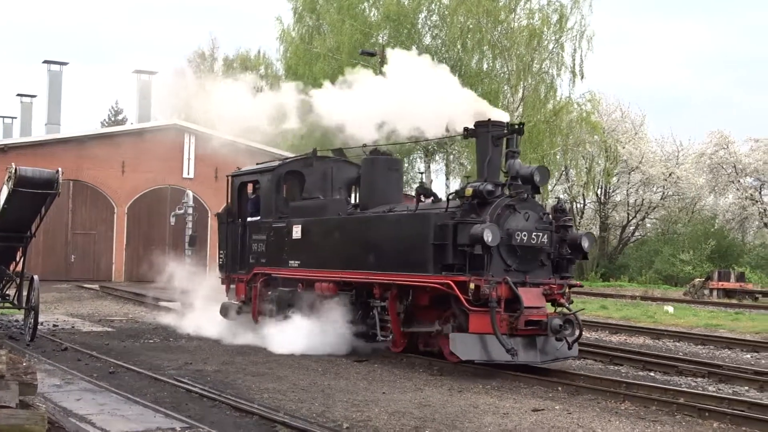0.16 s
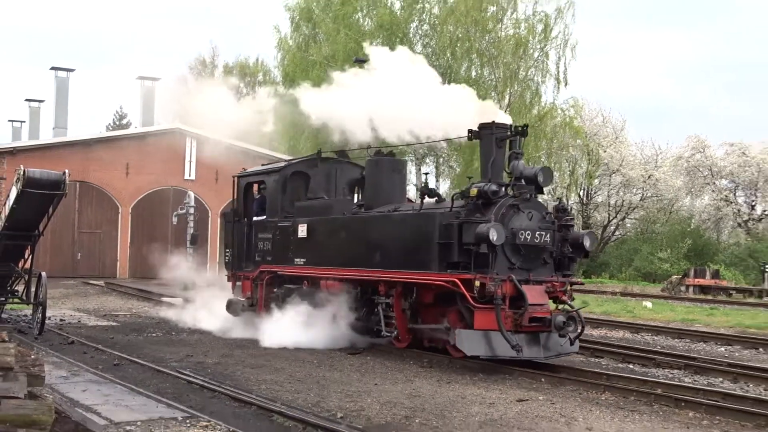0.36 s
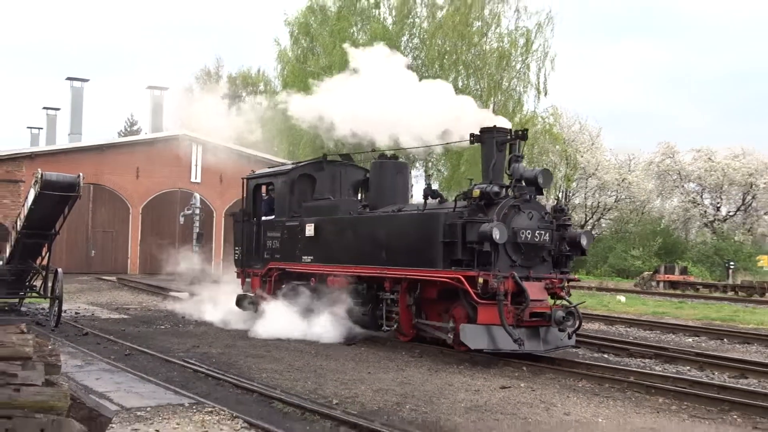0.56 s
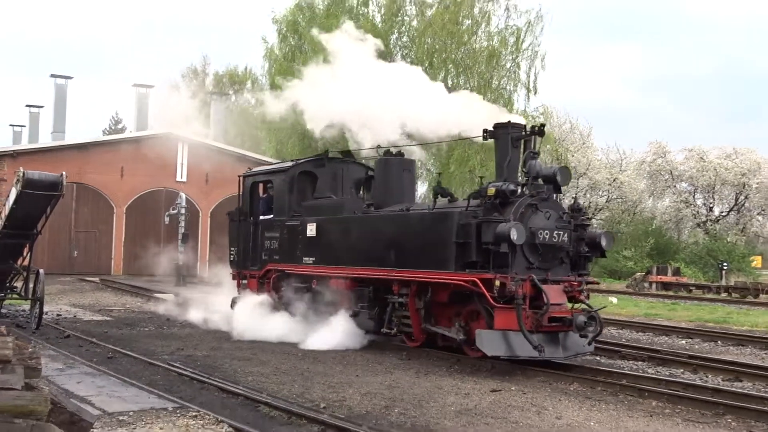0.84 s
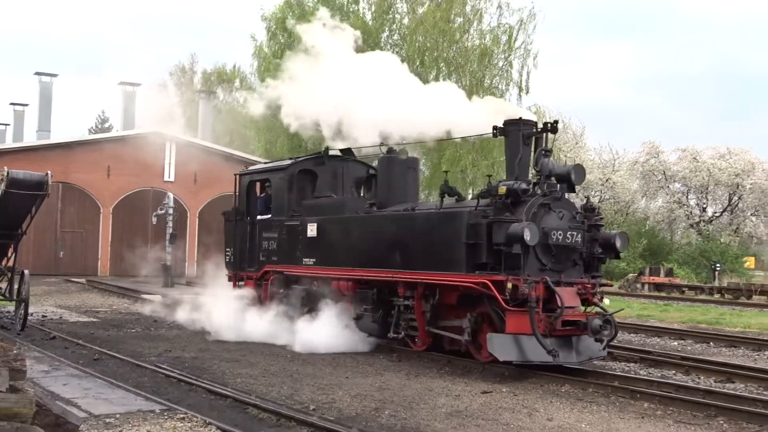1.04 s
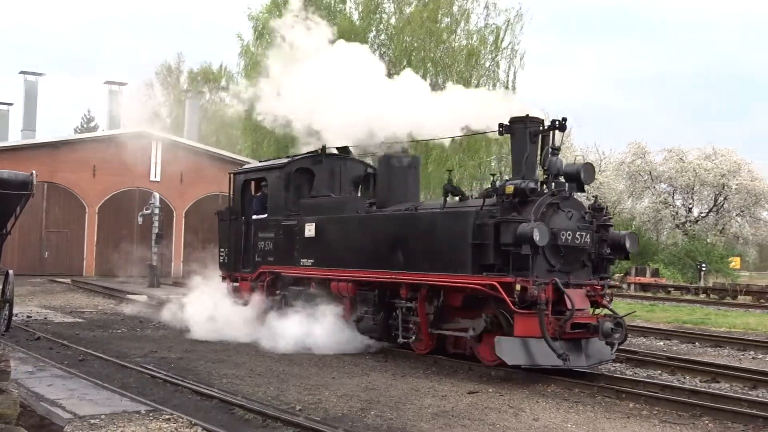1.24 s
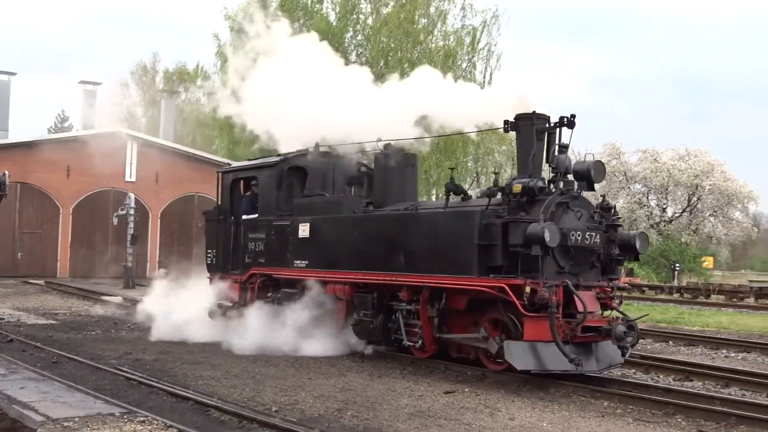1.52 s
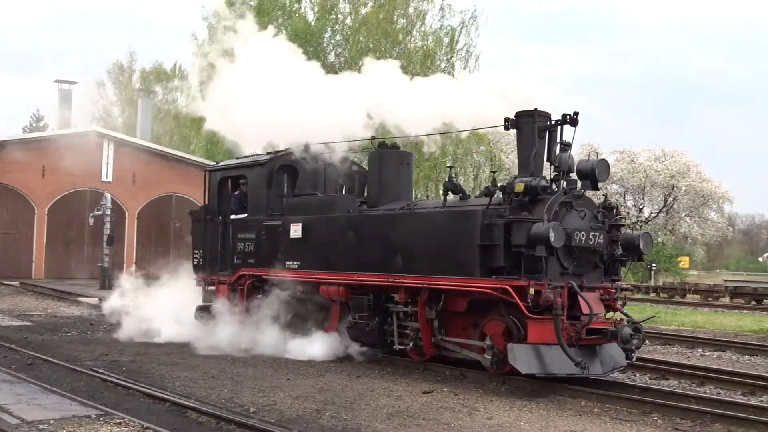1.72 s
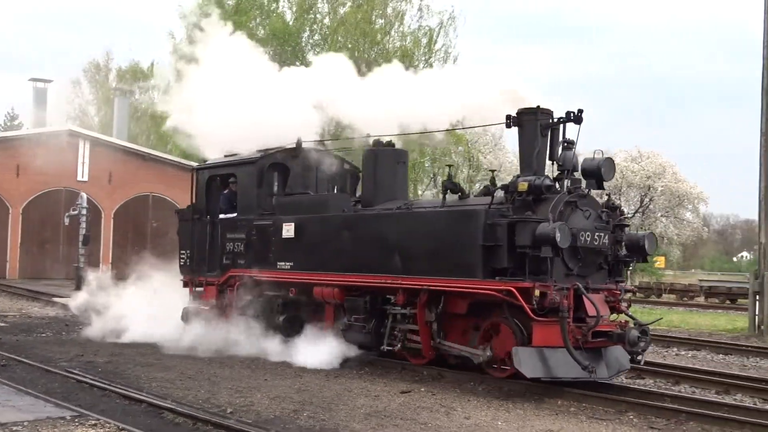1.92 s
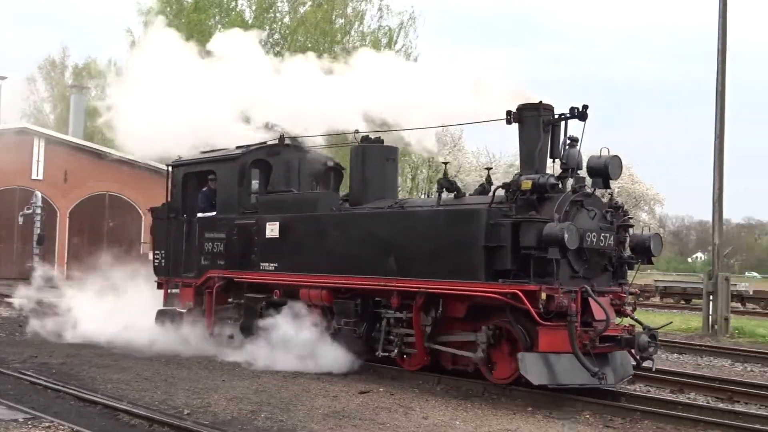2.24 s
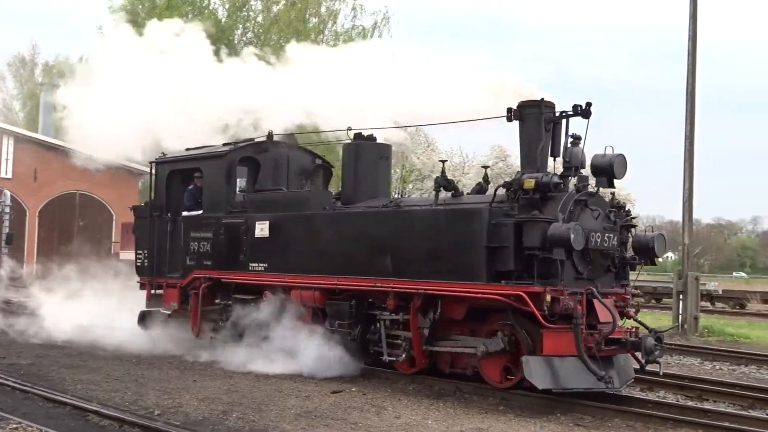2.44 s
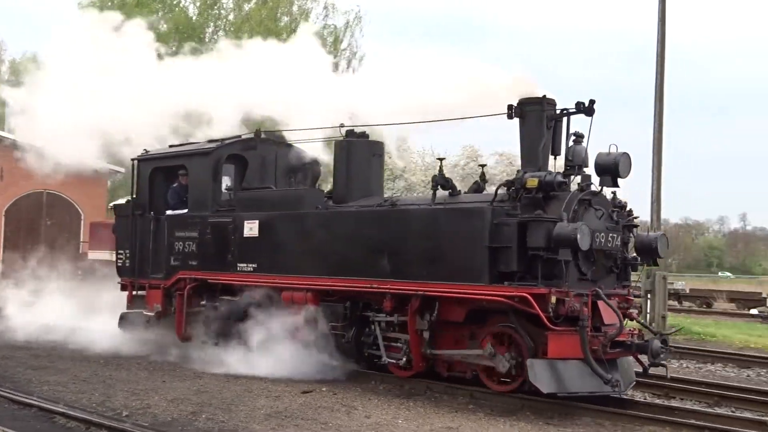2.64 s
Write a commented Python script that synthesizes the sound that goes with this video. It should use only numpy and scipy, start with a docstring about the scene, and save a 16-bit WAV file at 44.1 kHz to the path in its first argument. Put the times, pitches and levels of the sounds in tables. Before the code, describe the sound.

A steam locomotive rolls slowly closer, hissing bright wet steam throughout. A hard sputtering blast with a rough airy whistle comes early, another without it later, over soft chimney roar and faint rumble, outdoors in a yard.

```python
"""A steam locomotive rolls slowly closer across a yard, hissing wet steam from its open cylinder drain cocks.
The hiss is shaped noise; at two piston strokes a cock blows hard and its pipe rings as resonant noise.
A rough whistle, a narrow band of noise, rises with the first blow; water sputters and drops spit as clicks.
Low noise bands make the soft chimney roar, the rumbling running gear, the steam rush and short puffs.
Sliding echoes return from the engine's side and the shed."""
import sys
import numpy as np
from scipy import signal
from scipy.fft import rfft, irfft
from scipy.io import wavfile

SR = 44100
rng = np.random.default_rng(int(sys.argv[2]) if len(sys.argv) > 2 else 0)


def log_audio(samples):
    """Write samples as a 16-bit WAV file to the path given in sys.argv[1]."""
    # one column per channel
    frames = np.atleast_2d(samples).T
    # limit to full scale, then quantise
    limited = np.clip(frames, -1, 1)
    pcm = np.round(limited * 32767).astype(np.int16)
    wavfile.write(sys.argv[1], SR, pcm)


N = 122157
T = np.arange(N) / SR  # time of each sample [s]
HZ = np.maximum(np.fft.rfftfreq(N, 1 / SR), 1)  # frequency of each spectrum bin [Hz]

# Steam flow through the cocks, before trim: (time [s], level [dB])
FLOW = [(0, -28), (.13, -30.5), (.2, -32.5), (.34, -30.5), (.38, -26), (.43, -29.5), (.45, -24),
        (.65, -22.5), (.95, -23.5), (1.1, -27.5), (1.27, -24), (1.48, -28), (1.58, -22), (1.69, -20.5),
        (1.79, -22.5), (1.88, -21), (1.95, -22), (2.08, -21), (2.2, -22.5), (2.38, -23.5), (2.43, -20.5),
        (2.5, -21.5), (2.63, -23), (2.77, -19)]


def from_db(db):
    """Decibels to gain."""
    return 10 ** (np.asarray(db) / 20)


def rms_one(x):
    """Scale to unit rms."""
    return x / np.sqrt(np.mean(x ** 2) + 1e-20)


def in_time(rows):
    """Draw straight lines through (time, value) rows, one value per sample."""
    return np.interp(T, *np.transpose(rows))


def at_hz(points):
    """Read (frequency, value) rows at every bin, along a logarithmic frequency axis."""
    hz, value = np.transpose(points)
    return np.interp(np.log(HZ), np.log(hz), value)


def drift(rate):
    """Slow random wander of unit rms: noise through two equal one-pole lowpasses at rate [Hz]."""
    step = 40  # samples between control points
    pole = np.exp(-2 * np.pi * rate * step / SR)
    settling = 2000  # control points discarded while the filter settles
    steps = rng.standard_normal(N // step + settling + 2)
    slow = signal.lfilter([1], [1, -2 * pole, pole * pole], steps)[settling:]
    return np.interp(np.arange(N) / step, np.arange(len(slow)), rms_one(slow))


def flutter(depth_db, rate):
    """Gain of an unsteady flow, wandering by depth_db rms."""
    return from_db(depth_db * drift(rate))


def noise(gain):
    """Stereo turbulence of unit rms: random spectra in mid and side, shaped by a gain per frequency."""
    # stereo width: (frequency [Hz], side minus mid [dB])
    width_rows = [(60, -17), (170, -27.5), (400, -13), (1000, -12.5), (2800, -11.5), (5000, -13.5),
                  (7200, -18), (8700, -5), (11000, -13)]
    # stereo balance: (frequency [Hz], left minus right [dB])
    balance_rows = [(60, .1), (250, 0), (700, 1), (1200, 1.6), (2000, -0.9), (3600, 1.5), (7000, -0.2),
                    (8700, 4), (11000, -1)]
    real, imaginary = rng.standard_normal((2, 2, len(HZ)))
    mid, side = real + 1j * imaginary
    sign = np.array([[1], [-1]])  # left, right
    pair = mid + sign * from_db(at_hz(width_rows)) * side
    pair = pair * from_db(sign * at_hz(balance_rows) / 2)
    return rms_one(irfft(pair * gain, N))


def resonance(hz, width_hz):
    """Gain of a resonance, falling with the square of its detuning far from the centre."""
    return 1 / (1 + ((HZ ** 2 - hz ** 2) / (HZ * width_hz)) ** 2 / 2)


def ringing(modes, depth_db, rate):
    """Turbulence in a set of resonances, each wavering on its own."""
    return sum(from_db(db) * noise(resonance(hz, width_hz)) * flutter(depth_db, rate)
               for hz, width_hz, db in modes)


def waver(x, depth_db, rate, count):
    """Split the sound into overlapping strips, the lowest holding everything below the treble,
    each wandering in level; unit rms."""
    centres = np.linspace(4300, 10370, count)  # [Hz]
    spectrum = rfft(x)
    strips = 0
    for strip in np.eye(count):
        # triangular strips; the end strips stay open outward
        band = irfft(spectrum * np.interp(HZ, centres, strip), N)
        strips = strips + band * flutter(depth_db, rate)
    return rms_one(strips)


def yard(x):
    """Reflections cut hollows into the sound and comb it; their delays slide as the engine rolls."""
    # hollows in the colour: (frequency [Hz], width [Hz], level [dB])
    hollow_rows = [(1500, 60, -2.5), (3960, 48, -3.5), (6890, 114, -6), (8410, 160, -3), (9200, 90, -10)]
    # echoes from the engine's side and the shed: (delay [s], change of delay [s per s], level [dB])
    echo_rows = [(.0093, 0.004, -12), (.0217, 0.0035, -15.5), (.041, -0.0036, -13.5), (.067, -0.002, -13)]
    hollows_db = sum(db * np.exp(-((HZ - hz) / width_hz) ** 2 / 2) for hz, width_hz, db in hollow_rows)
    direct = irfft(rfft(x) * from_db(hollows_db), N)
    echoes = 0
    for delay, slide, db in echo_rows:
        heard_from = T - delay - slide * T
        echo = np.array([np.interp(heard_from, T, channel, left=0) for channel in direct])
        echoes = echoes + from_db(db) * echo
    return direct + echoes


def running_gear():
    """Wheels and rods rumble unevenly: low noise with a slow flutter."""
    # swells of the rumble: (time [s], level [dB])
    rumble_level = [(0, -51), (.3, -50), (.42, -46), (.55, -52), (.85, -56), (1.12, -45), (1.45, -51),
                    (1.62, -45), (1.69, -53), (2.04, -64), (2.09, -45), (2.27, -54), (2.33, -41),
                    (2.58, -49), (2.65, -38.5), (2.77, -55)]
    # colour of the rumble: (frequency [Hz], relative level [dB])
    rumble_colour = [(15, -14), (30, -17), (50, -7), (75, 2), (110, 1), (150, 0.5), (300, -32.5)]
    rumble = noise(from_db(at_hz(rumble_colour)))
    return rumble * from_db(in_time(rumble_level)) * flutter(depth_db=1.2, rate=3.3)


def chimney():
    """The soft hollow roar of exhaust steam: low noise with a fast flutter."""
    # swells of the roar, before trim: (time [s], level [dB])
    roar_level = [(0, -37.5), (.07, -35), (.17, -41), (.3, -37), (.45, -38), (.55, -39), (.8, -38.5),
                  (.9, -35), (1.25, -35), (1.62, -34), (1.72, -39.5), (2.05, -39.5), (2.09, -33),
                  (2.28, -35.5), (2.45, -33), (2.6, -33.5), (2.77, -31.5)]
    # colour of the roar, before the low cut: (frequency [Hz], relative level [dB])
    roar_colour = [(110, -13.5), (165, -2), (230, -0.5), (300, -1.5), (370, -1.5), (440, -9), (520, -18),
                   (640, -8), (780, -4), (950, -7.5), (1200, -9), (1500, -16.5), (2500, -30)]
    trim_db, low_cut_hz = 2, 108
    gain = from_db(at_hz(roar_colour)) / np.sqrt(1 + (low_cut_hz / HZ) ** 8)
    return noise(gain) * from_db(in_time(roar_level) + trim_db) * flutter(depth_db=1.47, rate=44)


def puffs():
    """Brief swells of escaping steam: resonant noise under bell-shaped envelopes."""
    # puffs: (centre time [s], length as bell-curve sigma [s], frequency [Hz], width [Hz], level [dB])
    puff_rows = [(0.127, 0.0077, 2470, 400, -34.5), (0.373, .03, 203, 69.7, -32.5),
                 (0.732, .025, 894, 451, -30.5), (.865, 0.0081, 645, 700, -30.5),
                 (1.548, 0.021, 261, 130, -31.5), (2.095, 0.029, 610, 600, -37.5),
                 (2.506, 0.015, 242, 111.3, -29.5)]
    total = 0
    for centre, length, hz, width_hz, db in puff_rows:
        swell = np.exp(-((T - centre) / length) ** 2 / 2)
        total = total + from_db(db) * swell * noise(resonance(hz, width_hz))
    return total


def rush():
    """Steam spreads along the ground: two noise bands swell separately and flutter together."""
    # swells of the low rush: (time [s], level [dB])
    low_level = [(0, -35), (.11, -38), (.2, -39.5), (.42, -37.5), (.47, -39), (.9, -29.5), (1.05, -36.5),
                 (1.2, -36), (1.35, -36.5), (1.5, -36), (1.62, -34.5), (1.72, -35.5), (2.08, -33),
                 (2.2, -36.5), (2.47, -32.5), (2.77, -36)]
    # colour of the low rush: (frequency [Hz], relative level [dB])
    low_colour = [(550, -18), (750, -6), (1150, -3), (1450, -4), (1750, 3), (2300, 2.5), (2650, -2.5),
                  (3000, -18), (4000, -36)]
    # swells of the upper rush: (time [s], level [dB])
    upper_level = [(0, -42), (.12, -39.5), (.2, -42), (.33, -48), (.385, -39), (.425, -44), (.455, -33),
                   (.6, -36.5), (.9, -32.5), (1.05, -37), (1.17, -41), (1.35, -34.5), (1.45, -39),
                   (1.56, -44), (1.66, -32), (1.87, -37), (2.09, -32.5), (2.31, -38), (2.45, -35),
                   (2.77, -33)]
    # colour of the upper rush: (frequency [Hz], relative level [dB])
    upper_colour = [(2000, -20), (2500, -1.5), (2850, 1.5), (3300, 2.5), (3950, -1.5), (4300, -0.5),
                    (5000, -5.5), (7000, -24)]
    low = noise(from_db(at_hz(low_colour))) * from_db(in_time(low_level))
    upper = noise(from_db(at_hz(upper_colour))) * from_db(in_time(upper_level))
    return (low + upper) * flutter(depth_db=1.0, rate=25)


def spits():
    """Drops of condensate burst at random: band-passed clicks, louder with the flow."""
    spits_per_s, level_db, spread_db = 130, -42.5, 1
    sizes_db = spread_db * np.minimum(rng.exponential(1, N), 3)
    bursts = rng.random(N) < spits_per_s / SR
    clicks = from_db(sizes_db) * rng.choice([-1, 1], N) * bursts
    band = signal.butter(1, (900, 6670), "band", fs=SR, output="sos")  # [Hz]
    crackle = rms_one(signal.sosfilt(band, clicks + 1e-18))
    flow_db = in_time(FLOW)
    # half a decibel for each decibel of flow
    return crackle * from_db(level_db + .5 * (flow_db - flow_db.mean()))


def sputter():
    """Water driven out with the steam sputters in each pipe's low resonances."""
    # envelope of each sputter: (time [s], level [dB])
    first_level = [(.42, -60), (.445, -27), (.495, -27.5), (.535, -36), (.565, -29.5), (.66, -32.5),
                   (.75, -30), (.785, -35), (.89, -34), (.97, -56), (1.1, -75)]
    second_level = [(1.62, -71), (1.648, -27), (1.678, -24), (1.71, -36), (1.77, -28.5), (1.86, -32.5),
                    (1.94, -31), (2.02, -38.5), (2.15, -49)]
    # low resonances of each pipe: (frequency [Hz], width [Hz], relative level [dB])
    first_throat = [(743, 100, -8.5), (1020, 190, -8), (1675, 200, -1.5), (2346, 300, -3.5)]
    second_throat = [(764, 96, -9), (1310, 175, -1.5), (1760, 67, -9), (2107, 44, -7), (2500, 37, -10.5)]
    first = from_db(in_time(first_level)) * ringing(first_throat, depth_db=2.04, rate=13)
    second = from_db(in_time(second_level)) * ringing(second_throat, depth_db=2.04, rate=13)
    return first + second


def whistle():
    """A narrow, fluttering band of turbulence that sags in pitch as it grows."""
    # swells of the whistle: (time [s], level [dB])
    whistle_level = [(0, -35.5), (.33, -36.5), (.38, -29), (.43, -31), (.455, -21.5), (.62, -23.5),
                     (.82, -23.5), (.95, -28), (1.1, -34.5), (1.4, -37), (2.2, -46), (2.77, -40)]
    centre_hz, width_hz, sag_hz_per_db = 7270, 280, 8.5
    db = in_time(whistle_level)
    sag_hz = sag_hz_per_db * (db - db.mean())
    bend = np.exp(-2j * np.pi * np.cumsum(sag_hz) / SR)
    # shifting the analytic signal moves the whole band in frequency
    band = signal.hilbert(noise(resonance(centre_hz, width_hz)))
    return from_db(db) * flutter(depth_db=1.0, rate=25) * np.real(band * bend)


def blows():
    """Each cock blows hard in turn, and turbulence rings in its drain pipe's resonances."""
    # one blow for each cock: (start [s], end [s], attack [s], release [s], level [dB])
    blow_rows = [(0.431, 0.847, 0.011, 0.15, -28), (1.633, 2.035, 0.039, 0.082, -28)]
    # resonances of the drain pipes: (frequency [Hz], width [Hz], relative level [dB])
    first_pipe = [(4520, 680, -15), (5160, 180, -4), (5650, 260, -8), (6500, 180, -11), (7800, 140, -19),
                  (9500, 200, -17), (10570, 430, -11.5)]
    second_pipe = [(4220, 168, -9.5), (5230, 140, -10.5), (5640, 220, -3), (6570, 650, 2.5),
                   (7030, 160, -3), (7540, 150, -0.5), (8060, 200, -4.5), (8900, 260, -16),
                   (10670, 110, -15)]
    total = 0
    for row, pipe in zip(blow_rows, (first_pipe, second_pipe)):
        start, end, attack, release, db = row
        envelope = np.clip((T - start) / attack, 0, 1) * np.exp(-np.maximum(T - end, 0) / release)
        total = total + from_db(db) * envelope * ringing(pipe, depth_db=2.7, rate=9.6)
    return total


def hiss():
    """Open jets as bright noise; the colour shifts as the engine nears, and strips of it waver."""
    # colour far off, then close by: (frequency [Hz], relative level [dB])
    far_colour = [(2500, -17), (3950, -9), (4350, -2.5), (4850, -4.5), (5700, 0), (6500, 3), (6850, 4),
                  (7600, -2), (8050, -1.5), (8400, -7), (9250, -5), (9600, -5.5), (11000, -7.5)]
    near_colour = [(2500, -19), (3950, -8), (4300, -7), (4850, -4.5), (5120, 3), (5400, -2.5), (5700, 3),
                   (6100, -1), (6550, 0.5), (6950, -1.5), (7400, 2), (7900, -7.5), (8150, -2.5), (8500, -9),
                   (9300, -2.5), (9900, -5.5), (11000, -6)]
    near_from_s, near_by_s, trim_db = 0.98, 1.75, 1.5
    near = np.clip((T - near_from_s) / (near_by_s - near_from_s), 0, 1)
    far_jet = np.sqrt(1 - near) * noise(from_db(at_hz(far_colour)))
    near_jet = np.sqrt(near) * noise(from_db(at_hz(near_colour)))
    jet = waver(far_jet + near_jet, depth_db=1.64, rate=11.6, count=14)
    return jet * from_db(in_time(FLOW) + trim_db)


def scene():
    """The whole engine in its yard; puffs and running gear stay free of reflections."""
    wet = sputter() + spits()
    steam = hiss() + rush() + blows() + whistle() + wet + chimney()
    return yard(steam) + puffs() + running_gear()


def record(dry):
    """Cut the top steeply with a long lowpass filter."""
    lowpass = signal.firwin(801, 11050, fs=SR, window=("kaiser", 9))  # cutoff [Hz]
    return signal.fftconvolve(dry, lowpass[None], "same", axes=1)


dry = scene()
out = record(dry)
log_audio(out)
```